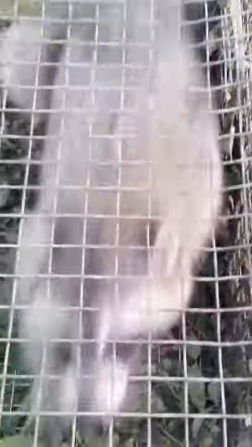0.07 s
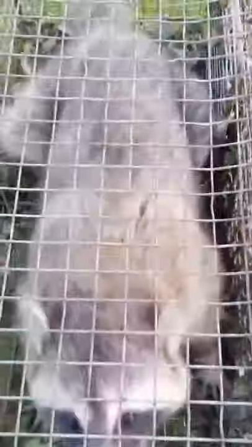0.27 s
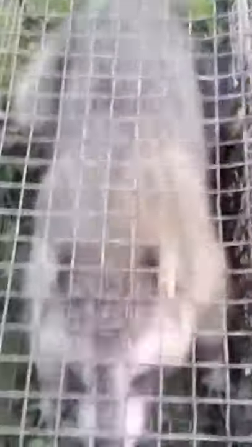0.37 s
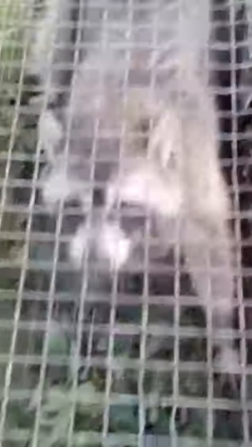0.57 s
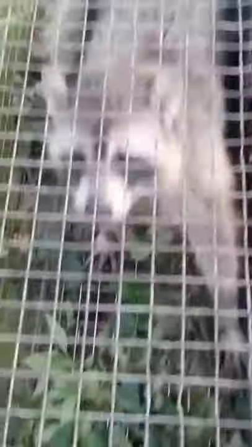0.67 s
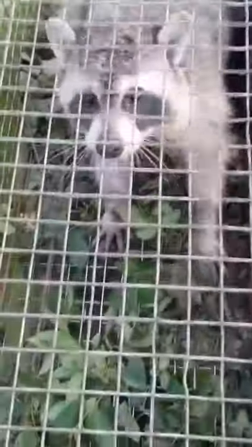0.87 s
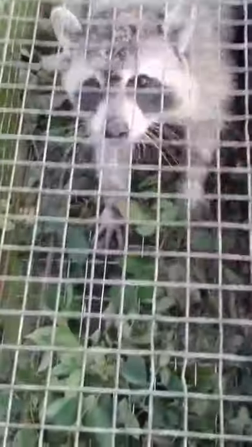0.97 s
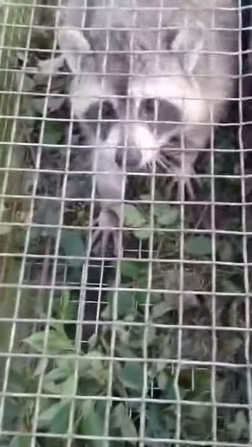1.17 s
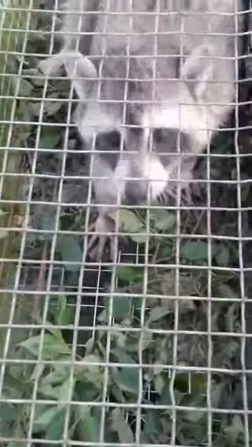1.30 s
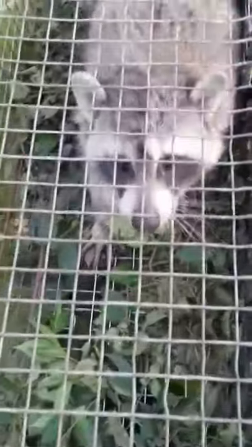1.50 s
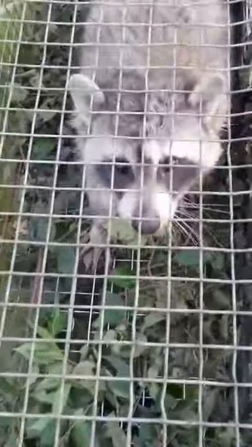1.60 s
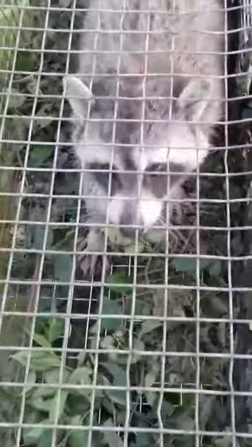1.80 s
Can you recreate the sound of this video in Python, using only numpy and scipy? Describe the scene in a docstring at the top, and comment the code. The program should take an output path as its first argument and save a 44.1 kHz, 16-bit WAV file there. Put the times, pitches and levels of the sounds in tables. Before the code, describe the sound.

A raccoon's harsh snarl is the main sound, close by. First, leaves rustle and paws thud softly, with two quick knocks on a wire cage around 0.25 seconds. The snarl bursts out at 0.3 seconds, rasping and hissing, and trails into a low growl that ends by 0.8. A faint hiss and slight rustle follow from about 1.1 to 1.6 seconds, over quiet garden air.

```python
"""In a quiet garden, a raccoon lunges in a wire cage just below the microphone. Leaves rustle under
the cage, its paws thud and the cage rings with two knocks. Then comes one harsh snarl: throat pulses
and breath ring in the mouth as a rasp, air forced past the teeth adds a hiss, and a low growl
lingers as the mouth closes. The animal backs off with a faint hiss."""
import sys
import numpy as np
from scipy import signal
from scipy.fft import rfft, irfft, next_fast_len
from scipy.io import wavfile
from scipy.ndimage import map_coordinates

SR = 44100
rng = np.random.default_rng(int(sys.argv[2]) if len(sys.argv) > 2 else 0)


def generate_wav(signal):
    """Clip the signal to [-1, 1] and save it as 16-bit WAV at the path in sys.argv[1]."""
    frames = np.transpose(np.atleast_2d(signal))
    scaled = np.clip(frames, -1, 1) * 32767
    pcm = np.round(scaled).astype(np.int16)
    wavfile.write(sys.argv[1], SR, pcm)


N = 81585
TIME = np.arange(N) / SR


def amp(db):
    """Turn decibels into a gain."""
    return 10 ** (np.asarray(db) / 20)


def unit(x):
    """Scale a signal to an average (rms) level of 1."""
    return x / np.sqrt(np.mean(x ** 2) + 1e-20)


def along(points, hz):
    """Read between (Hz, value) points, giving each octave equal room."""
    freqs, values = np.transpose(points)
    return np.interp(np.log(hz + 1), np.log(freqs + 1), values)


def curve(rows, column=1):
    """Turn one column of a timed table into a value per sample."""
    rows = np.array(rows)
    return np.interp(TIME, rows[:, 0], rows[:, column])


def level(rows, column=1):
    """Gain from a timed column of decibels, silent before and after it."""
    return amp(curve(rows, column)) * (TIME >= rows[0][0]) * (TIME <= rows[-1][0])


def wobble(hz):
    """A smooth random curve through hz new values a second."""
    return map_coordinates(rng.standard_normal(N // 8), [TIME * hz], mode="wrap")


def filtered(x, response):
    """Scale each frequency of x by response(hz)."""
    size = next_fast_len(N + SR // 4)
    return irfft(rfft(x, size) * response(np.fft.rfftfreq(size, 1 / SR)), size)[..., :N]


def resonate(x, hz, width_hz):
    """Keep a narrow band of x around a frequency that may glide."""
    spin = np.exp(2j * np.pi * np.cumsum(hz * np.ones(N)) / SR)
    b, a = signal.bessel(2, width_hz / 2, fs=SR, norm="mag")
    band = signal.filtfilt(b, a, x / spin, padtype="even", padlen=SR // 10)
    return unit((band * spin).real)


def sides(left_db, right_db):
    """Gains of the two microphones."""
    return amp([[left_db], [right_db]])


def lean(pair, balance):
    """Tip each frequency to the left or right."""
    return filtered(pair, lambda hz: amp(np.array([along(balance, hz), -along(balance, hz)]) / 2))


# Nearby sounds. Each row: frequency in Hz, how alike left and right are (1 same, -1 opposite).
NEAR_ALIKE = [(100,.97),(400,1),(700,0.86),(1000,0.6),(2000,0.4),(4000,0.033),(12000,0.017)]
def spread(pair, alike=NEAR_ALIKE):
    """Blend two unrelated noises so that left and right partly match."""
    turn = lambda hz: np.arccos(np.clip(along(alike, hz), -1, 1)) / 2
    mid, side = filtered(pair, lambda hz: np.array([np.cos(turn(hz)), np.sin(turn(hz))]))
    return np.array([mid + side, mid - side])


def rush(colour, alike=NEAR_ALIKE):
    """Steady stereo noise with the given tone colour."""
    noise = spread(rng.standard_normal((2, N)), alike)
    return unit(filtered(noise, lambda hz: amp(along(colour, hz))))


# Tone of the air and the rumble. Each row: frequency in Hz, relative level in dB.
AIR_COLOUR = [(150, -28), (250, -7), (291, -11), (507, -4.5), (552, -7.5), (710, -3.5), (2200, -11.5),
              (3020, -17), (5830, -13), (14000, -13)]
RUMBLE_COLOUR = [(15, -65), (25, -51), (54, -19), (81, -10), (134, -3), (254, -15.5), (289, -18.5),
                 (325, -15.5), (400, -27.5), (520, -22), (880, -120)]
# The air's rise and fall. Each row: time in seconds, level in dB.
AIR_LEVEL = [(0,-46.5),(.8,-47.5),(.92,-49.5),(1.05,-47),(1.45,-46.5),(1.7,-48),(1.85,-50)]
# The garden's width. Each row: frequency in Hz, how alike left and right are.
GARDEN_LIKENESS = [(60, 1), (180, 0.96), (530, 0.72), (1570, -0.53), (4670, 0.5), (13900, -0.6)]
# Its lean to the left. Each row: frequency in Hz, left minus right in dB.
GARDEN_LEAN = [(60, 0), (130, 1.5), (280, 2.5), (620, 3), (1350, 6.5), (2930, 2.5), (6370, 3.5), (13900, 4)]
def garden(dull_hz=3500, rumble_db=-46):
    """Soft outdoor air over a low rumble."""
    air = unit(filtered(rush(AIR_COLOUR, GARDEN_LIKENESS), lambda hz: 1 / (1 + (hz / dull_hz) ** 2)))
    rumble = rush(RUMBLE_COLOUR, GARDEN_LIKENESS) * amp(rumble_db - 0.5 * wobble(hz=25.08))
    air *= amp(curve(AIR_LEVEL) + 0.43 * wobble(hz=8.95))
    return lean(air + rumble, GARDEN_LEAN)


# Tone of the rustle. Each row: frequency in Hz, relative level in dB.
RUSTLE_COLOUR = [(300,-30),(1000,-5.5),(2000,0),(2900,-6),(4500,0),(6500,5),(8500,-1),(11000,-5),(14000,-13)]
# Its rise and fall. Each row: time in seconds, level in dB.
RUSTLE_LEVEL = [(0,-52),(.08,-50),(.11,-46),(.183,-40),(.187,-30),(.22,-34),(.26,-26),(.28,-29),(.32,-26),(.7,-37),(.82,-50),(.835,-43),(.885,-45.5),(.92,-53.5),(1.2,-56),(1.43,-47.5),(1.6,-57),(1.8,-76)]
# Its direction. Each row: frequency in Hz, left minus right in dB.
RUSTLE_LEAN = [(800,10),(2000,1),(4000,3),(7000,-4),(10000,-3.5),(13000,1.5)]
def leaves(grain_db=2):
    """Fur and leaves make a grainy rustle as the animal moves."""
    grains = unit(rush(RUSTLE_COLOUR) * amp(grain_db * wobble(hz=490)))
    return lean(grains, RUSTLE_LEAN) * level(RUSTLE_LEVEL)


# Tone of the scuffling body. Each row: frequency in Hz, relative level in dB.
SCUFFLE_TONE = [(30,-38),(50,-17),(80,6),(160,3.5),(300,12.5),(600,-1),(1200,-1.5),(2500,-63)]
# Its rise and fall. Each row: time in seconds, level in dB.
SCUFFLE_LEVEL = [(.07,-51),(.11,-44.5),(.17,-46),(.2,-32),(.29,-26),(.34,-31),(.38,-66)]
# Paws landing. Each row: start in seconds, peak level in dB, pitch in Hz.
PAW_THUDS = [(0.103,-23,171.8),(.134,-27,145),(0.2,-18.5,170),(0.231,-20.5,132),(.264,-17.5,178),(.285,-16,150)]
def paws(rise_s=0.0088, fade_s=0.049):
    """Paws thud softly on the cage floor while the body scuffles."""
    out = rush(SCUFFLE_TONE) * level(SCUFFLE_LEVEL)
    for start, db, hz in PAW_THUDS:
        age = np.maximum(TIME - start, 0)
        swell = (1 - np.exp(-(age / rise_s) ** 2)) * amp(-60 * age / fade_s)
        out += amp(db) * swell / swell.max() * np.sin(2 * np.pi * hz * age)
    return out


# Knocks on the cage. Each row: start in seconds, strength in dB.
CAGE_KNOCKS = [(0.2391,-3.5),(0.2677,-7.5)]
# Its ringing notes. Each row: pitch in Hz, left and right gain in dB, seconds to fade by 60 dB.
CAGE_NOTES = [(637,-17.5,-28,0.082),(1002,-14,-5.5,0.032),(1263,-2.5,-11,0.014),(1638,1.5,-10,0.018),(1740,-35,-22,0.06)]
def cage(crack_db=-12, crack_fade_s=0.0041, rise_s=0.0001, dull_hz=2160):
    """Each knock gives a short crack and sets the wire cage ringing briefly."""
    out = np.zeros((2, N))
    for start, db in CAGE_KNOCKS:
        age = np.maximum(TIME - start, 0)
        ring = np.zeros((2, N))
        for hz, left, right, fade_s in CAGE_NOTES:
            fade = amp(rng.normal(0, 1) - 60 * age / fade_s)
            ring += sides(left, right) * fade * np.sin(2 * np.pi * hz * age)
        crack = amp(crack_db - 60 * age / crack_fade_s) * rng.standard_normal((2, N))
        out += amp(db) * (crack - ring) * (1 - np.exp(-age / rise_s))
    return signal.sosfilt(signal.butter(8, dull_hz, fs=SR, output="sos"), out)


# The vibrating throat. Each row: time in seconds, pitch in Hz.
THROAT_PITCH = [(.32,156),(.43,155),(.475,171.1),(.53,160.5),(.58,167.7),(.612,160.1),(.65,142),(.69,155.1),(.8,165.7)]
def throat_cycles(waver, waver_hz):
    """Count the throat's vibrations so far, as its pitch wavers at random."""
    return np.cumsum(curve(THROAT_PITCH) * np.exp(waver * wobble(waver_hz))) / SR


HISS_NOISE_SHARE, SPLUTTER_DB, FLUTTER_HZ = 0.97, 2, 110.47
def airflow(noise_share, uneven_db=4, surge=0.11):
    """Uneven throat pulses mix with rushing breath that surges once per vibration."""
    cycles = throat_cycles(waver=0.27, waver_hz=200)
    pulses = np.diff(np.floor(cycles), prepend=0) * amp(uneven_db * wobble(hz=200))
    puffs = rng.standard_normal((2, N)) * (1 + surge * np.cos(2 * np.pi * cycles))
    return np.sqrt(1 - noise_share) * unit(pulses) + np.sqrt(noise_share) * unit(spread(puffs))


# The moving mouth. Each row: time in seconds, its own ring in Hz, how closed it is from 0 to 1,
# and a factor that retunes the other rings as the throat tightens.
MOUTH_SHAPE = [(.30,1700,0.22,.94),(.345,1876,0.08,1.024),(.40,1930,0,.99),(.48,1790,0.07,1.06),(.55,1700,0.17,1.006),(.61,1660,0,1.09),(.645,1680,0.7,1.046),(.68,1700,1,1.14),(.8,1700,0.92,1.035)]
def airway(air, rings, swirl_db=2.18):
    """Air rings at frequencies that shift with the mouth; each ring swells and sinks on its own."""
    closed, tuning = curve(MOUTH_SHAPE, column=2), curve(MOUTH_SHAPE, column=3)
    out = np.zeros((2, N))
    for hz, width_hz, left, right, closed_db in rings:
        ring = resonate(air, hz * tuning, width_hz) * sides(left, right)
        out += ring * amp(closed_db * closed + swirl_db * wobble(hz=34.33))
    return out


def whistle(track, width_hz):
    """Air through a narrow gap sings in one gliding, spluttering band."""
    tone = resonate(airflow(HISS_NOISE_SHARE), curve(track), width_hz)
    tone *= amp(SPLUTTER_DB * wobble(FLUTTER_HZ))
    return unit(tone) * level(track, column=2) * sides(1.5, -1.5)


# The lingering hiss. Each row: time in seconds, frequency in Hz, level in dB.
PARTING_HISS = [(1.1,6500,-74),(1.2,6140,-63),(1.32,6000,-64),(1.42,6300,-59),(1.5,6460,-72),(1.62,6500,-80)]
def parting_hiss():
    """The animal breathes a faint hiss as it backs off."""
    return whistle(PARTING_HISS, width_hz=1900)


# The growl's rise and fall. Each row: time in seconds, level in dB.
GROWL_LEVEL = [(.28,-77),(.32,-23),(.337,-22.5),(.352,-32),(.44,-41.5),(.468,-26.5),(.53,-26),(.578,-22),(.635,-24),(.67,-27),(.735,-31),(.76,-34),(.795,-36),(.82,-80)]
def growl():
    """The throat's lowest note, half unsteady tone and half rough flutter."""
    tone = unit(np.sin(2 * np.pi * throat_cycles(waver=0.098, waver_hz=90)))
    rough = resonate(rng.standard_normal(N), curve(THROAT_PITCH), width_hz=110)
    return np.sqrt(0.5) * (tone + rough) * level(GROWL_LEVEL)


# Tone of the breath. Each row: frequency in Hz, relative level in dB.
BREATH_COLOUR = [(400,-62),(1200,-21),(2400,-5.5),(2900,3.5),(5000,-3),(7000,-9.5),(9000,-11),(11500,-7),(14000,-45)]
# Rings of teeth and lips. Each row: centre and width in Hz, then left gain, right gain
# and change with the mouth closed, all in dB.
TEETH_RINGS = [(3530,220,-8.5,-10.5,0),(4100,290,-2.5,-10,-17),(4930,960,0,-11.5,-3.5),(6480,1650,-15,-1.5,10),(8070,1400,-7,-4.5,5)]
# The hiss's rise and fall. Each row: time in seconds, level in dB.
HISS_LEVEL = [(.27,-50),(.30,-22),(.325,-18.5),(.41,-22),(.48,-26),(.54,-18),(.575,-19.5),(.62,-24.5),(.68,-32.5),(.74,-34),(.79,-45),(.83,-55)]
# The opening spit, a whistle between the teeth and a last wheeze through the nearly closed mouth.
# Each row: time in seconds, frequency in Hz, level in dB.
OPENING_SPIT = [(.29,6070,-45),(.3,5920,-31),(.322,6500,-22),(.345,6600,-38)]
TEETH_WHISTLE = [(.33,5200,-35),(.385,5400,-22),(.42,5240,-24.5),(.465,5360,-29.5),(.54,5290,-29.5),(.578,5180,-20.5),(.61,5600,-26.5),(.638,5580,-23),(.668,5700,-31.5),(.69,5700,-52)]
LAST_WHEEZE = [(.62,3270,-46),(.66,3350,-36),(.71,3600,-47),(.735,3765,-33.5),(.76,3520,-44),(.79,3470,-42.5),(.82,3280,-65)]
def hiss():
    """The raccoon forces air past its teeth in spluttering, whistling bursts."""
    air = airflow(HISS_NOISE_SHARE)
    breath = unit(filtered(air, lambda hz: amp(along(BREATH_COLOUR, hz)))) * sides(2.5, 5)
    out = unit(airway(air, TEETH_RINGS) + breath) * level(HISS_LEVEL)
    out *= amp(SPLUTTER_DB * wobble(FLUTTER_HZ))
    out += whistle(OPENING_SPIT, width_hz=1100)
    out += whistle(TEETH_WHISTLE, width_hz=570)
    return out + whistle(LAST_WHEEZE, width_hz=720)


# Rings of the throat. Each row: centre and width in Hz, then left gain, right gain
# and change with the mouth closed, all in dB.
THROAT_RINGS = [(309.4,82,-6,-5,2.5),(615,274,-0.5,-2.5,2.5),(864,146,-1.5,-9,-1),(956,87,-4,6.5,-2.5),(1216,165,-5,-5,4.5),(1376,170,-0.5,-12,-39),(1620,290,-4,-19,-1.5),(1992,420,-2.5,-8.5,-12),(2270,430,-9.5,-8,-27)]
# The rasp's rise and fall. Each row: time in seconds, level in dB.
RASP_LEVEL = [(.27,-51),(.294,-40),(.301,-17.5),(.326,-11),(.38,-14),(.44,-17),(.484,-18),(.525,-15.5),(.58,-18),(.64,-26.5),(.66,-26.5),(.70,-30.5),(.75,-37.5),(.80,-47.5),(.84,-57)]
def rasp(closed_db=-9):
    """Rough air rings in the throat and mouth, making the harsh body of the snarl."""
    air = airflow(noise_share=0.78)
    mouth = resonate(air, curve(MOUTH_SHAPE), width_hz=210) * sides(0, -5.5)
    mouth *= amp(closed_db * curve(MOUTH_SHAPE, column=2))
    voice = unit(airway(air, THROAT_RINGS) + mouth)
    return voice * level(RASP_LEVEL) * amp(-0.53 * wobble(FLUTTER_HZ))


# The head's path. Each row: time in seconds, left minus right in dB for the rasp, then for the hiss.
HEAD_PATH = [(.3,2.5,-1),(.425,1,2),(.47,-0.5,0),(.53,0,0),(.6,1,-3),(.74,-2,-3.5)]
def head_swing(column):
    """Left and right gains as the head swings past the microphone."""
    pan_db = curve(HEAD_PATH, column)
    return amp([pan_db / 2, -pan_db / 2])


# The throaty ring that ends the snarl. Each row: time in seconds, frequency in Hz, level in dB.
CLOSING_RING = [(.62,1310,-41),(.665,1304,-37),(.697,1310,-29),(.72,1340,-38),(.755,1280,-43),(.8,1250,-51)]
def snarl(low_cut_hz=80):
    """Hiss, rasp, growl and a closing ring join in one breath with little deep bass."""
    voice = hiss() * head_swing(column=2) + rasp() * head_swing(column=1)
    voice += growl() + whistle(CLOSING_RING, width_hz=200)
    return filtered(voice, lambda hz: 1 - 1 / (1 + (hz / low_cut_hz) ** 4))


def scene(right_lag_s=0.00012, echo_db=-11.5, echo_fade_s=0.12):
    """The animal's sound reaches the left microphone first; the ground and nearby things echo it."""
    near = snarl() + parting_hiss() + paws() + cage()
    delays = np.array([[0], [right_lag_s]])
    near = filtered(near, lambda hz: np.exp(-2j * np.pi * hz * delays))
    age = TIME[:SR // 4]
    tail = rng.standard_normal((2, len(age))) * amp(-60 * age / echo_fade_s)
    echo = signal.fftconvolve(near, tail / np.linalg.norm(tail[0]), axes=1)[:, :N]
    return near + amp(echo_db) * echo + leaves() + garden()


def record(dry, top_hz=14460):
    """Round off the tallest peaks and remove the highest treble."""
    rounded = dry / (1 + dry ** 6) ** (1 / 6)
    return filtered(rounded, lambda hz: hz < top_hz)


dry = scene()
out = record(dry)
generate_wav(out)
```